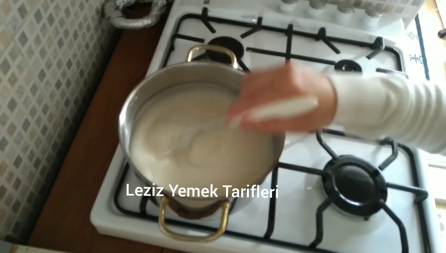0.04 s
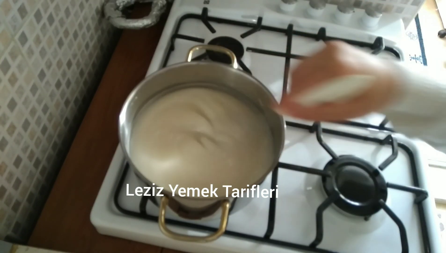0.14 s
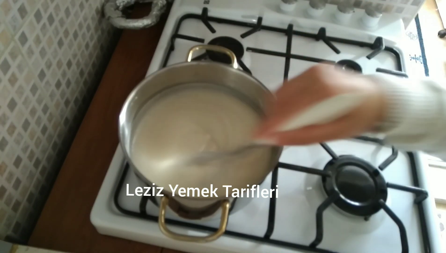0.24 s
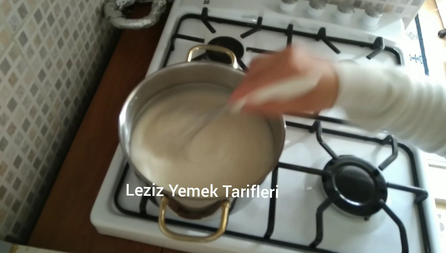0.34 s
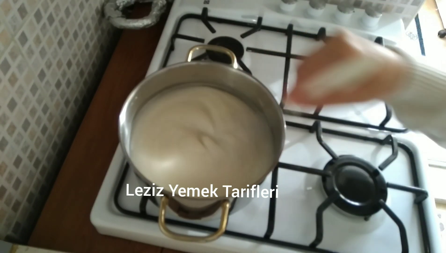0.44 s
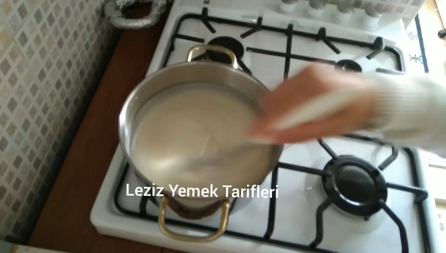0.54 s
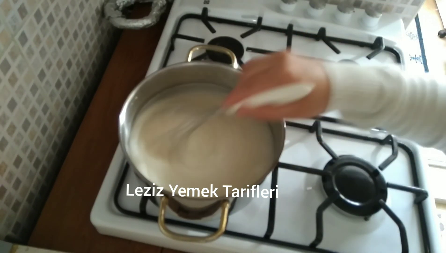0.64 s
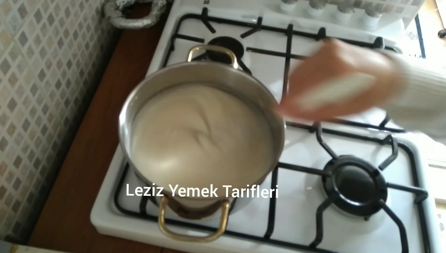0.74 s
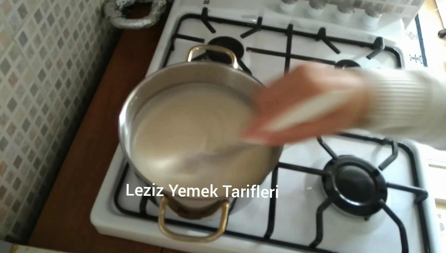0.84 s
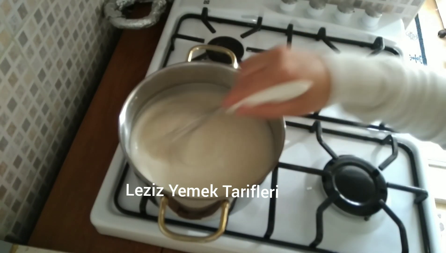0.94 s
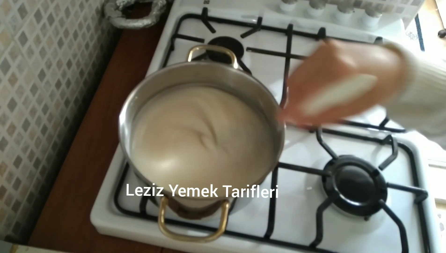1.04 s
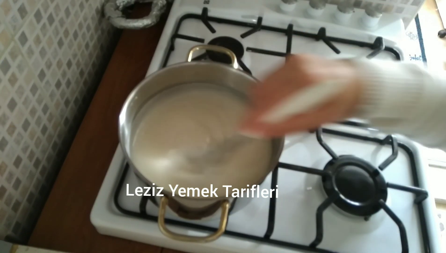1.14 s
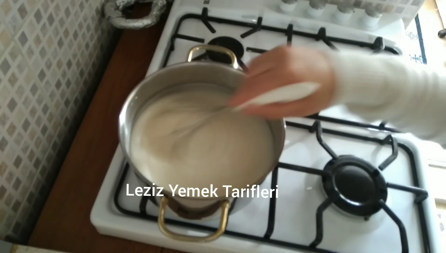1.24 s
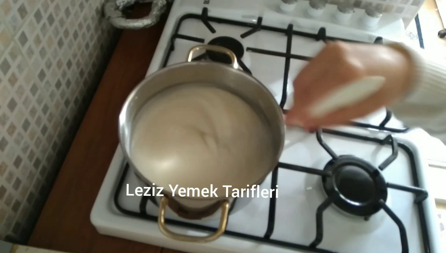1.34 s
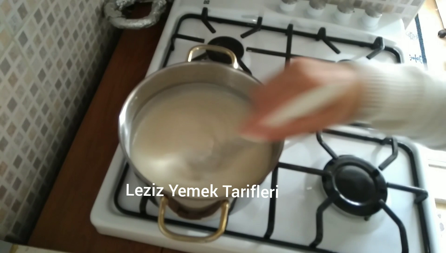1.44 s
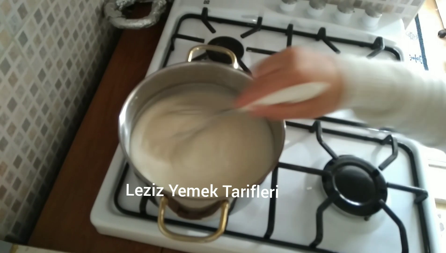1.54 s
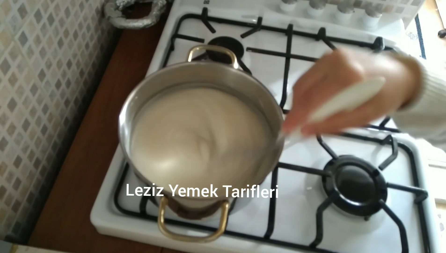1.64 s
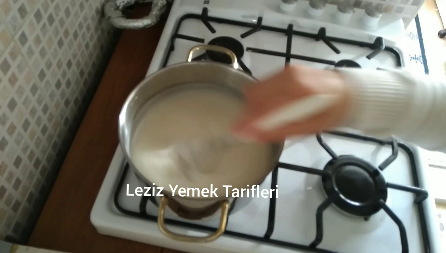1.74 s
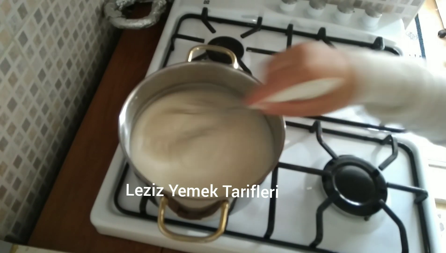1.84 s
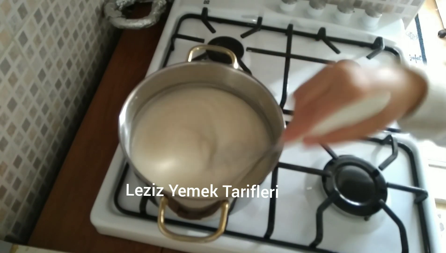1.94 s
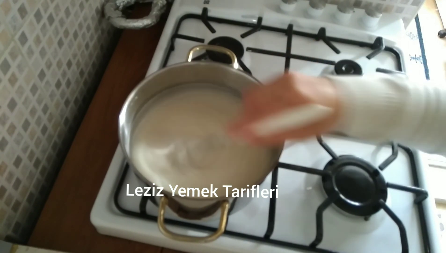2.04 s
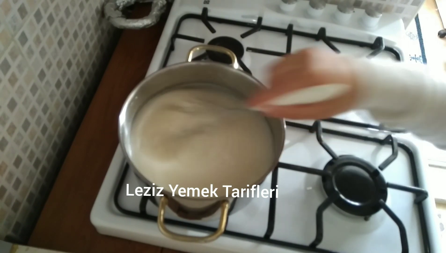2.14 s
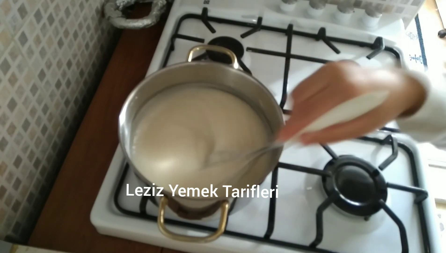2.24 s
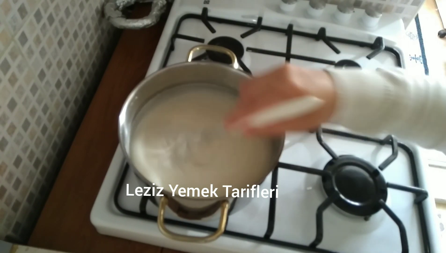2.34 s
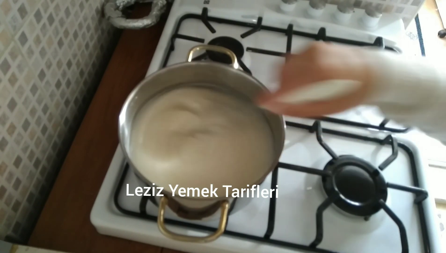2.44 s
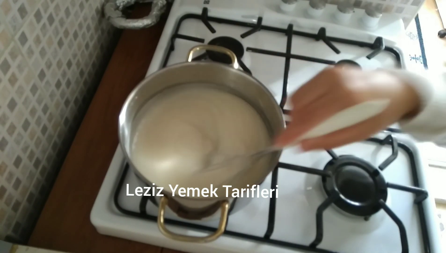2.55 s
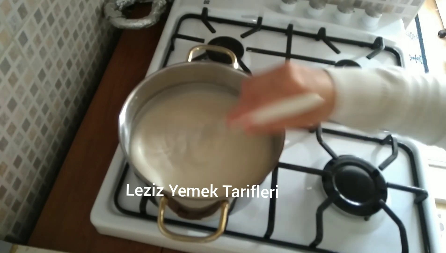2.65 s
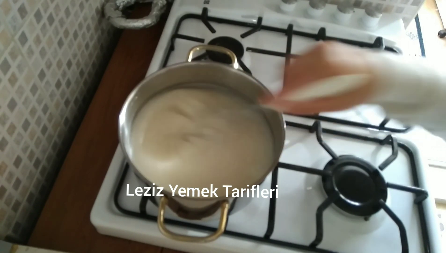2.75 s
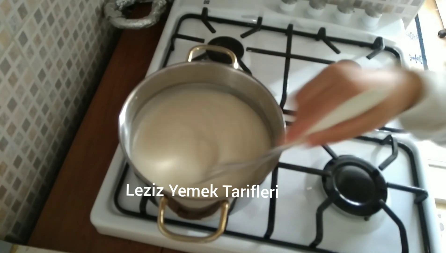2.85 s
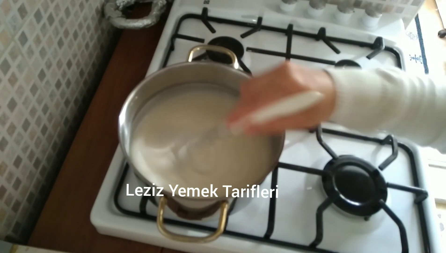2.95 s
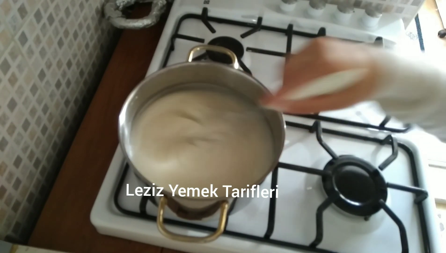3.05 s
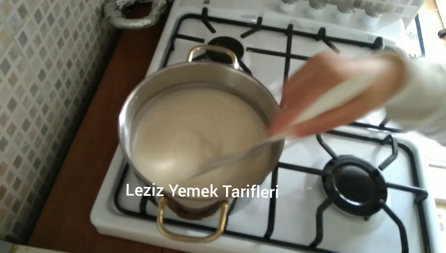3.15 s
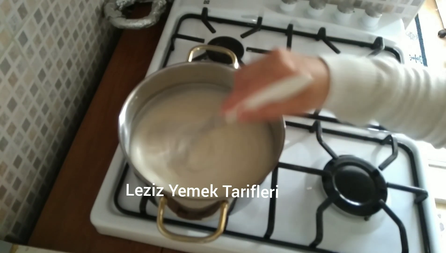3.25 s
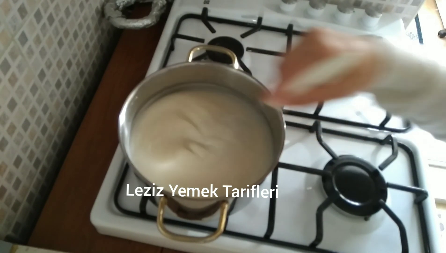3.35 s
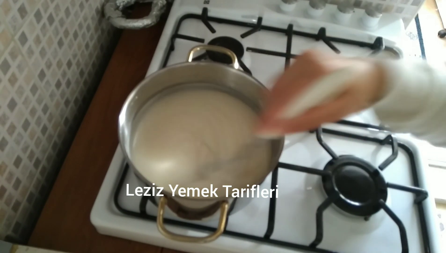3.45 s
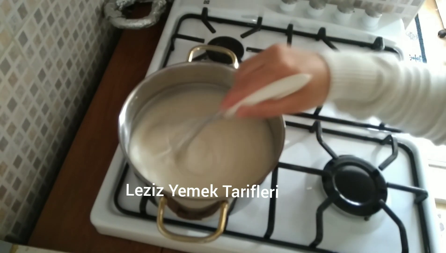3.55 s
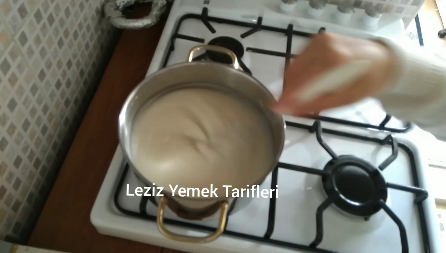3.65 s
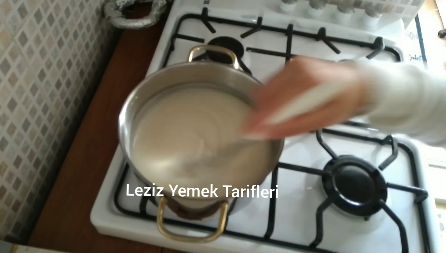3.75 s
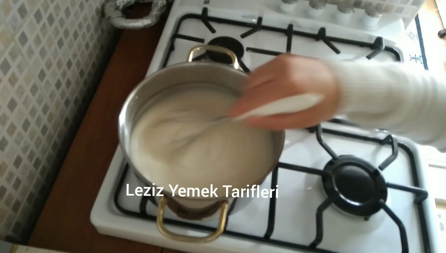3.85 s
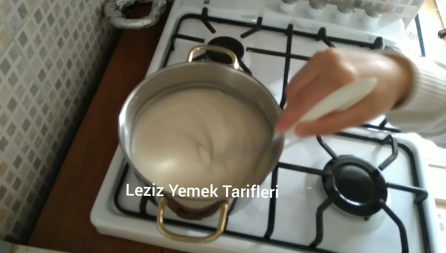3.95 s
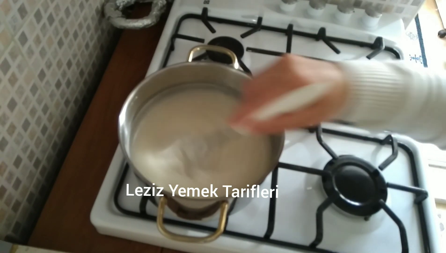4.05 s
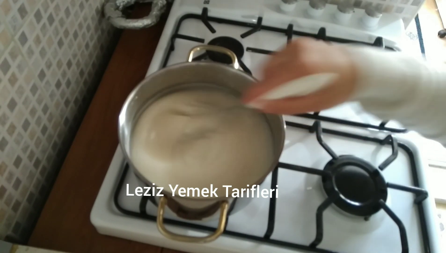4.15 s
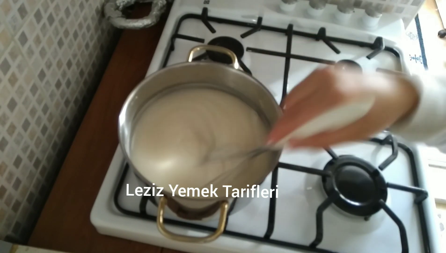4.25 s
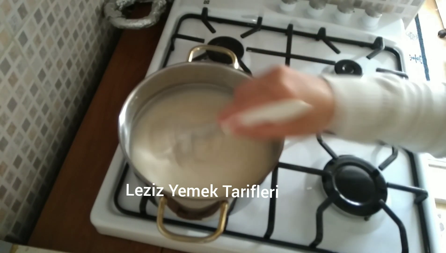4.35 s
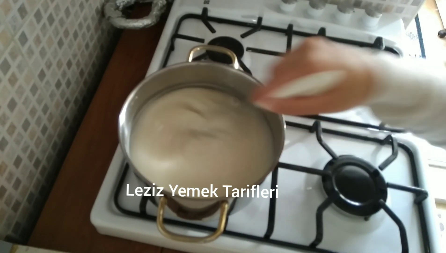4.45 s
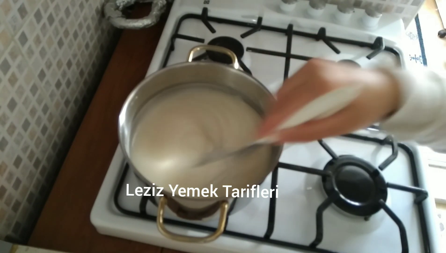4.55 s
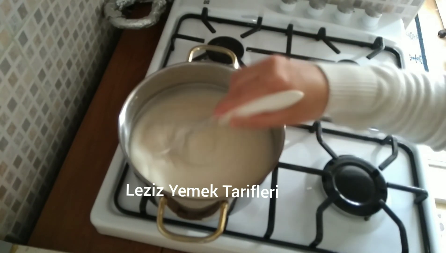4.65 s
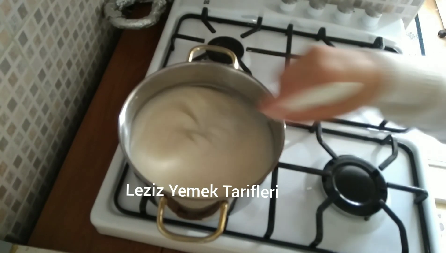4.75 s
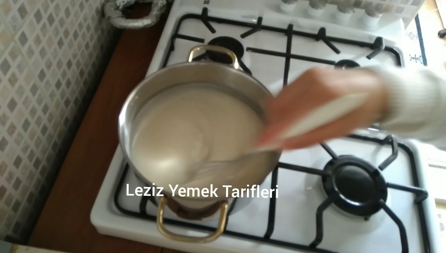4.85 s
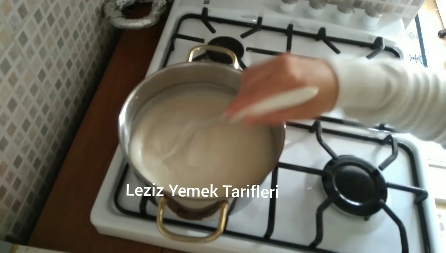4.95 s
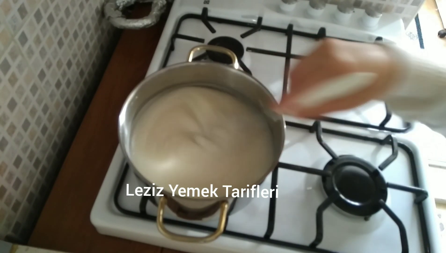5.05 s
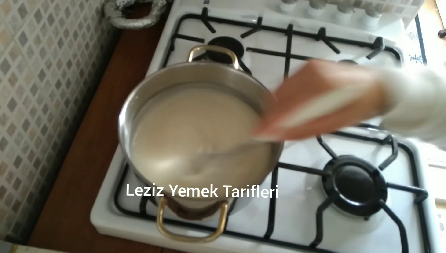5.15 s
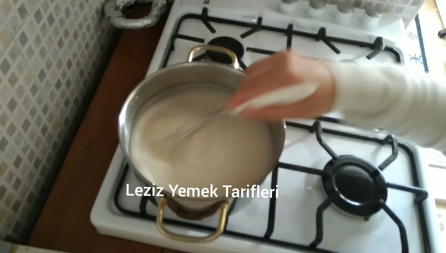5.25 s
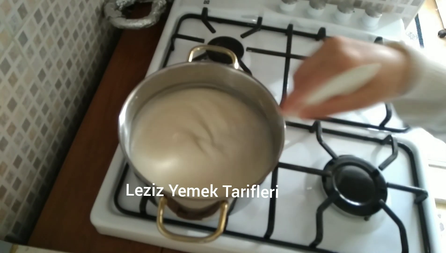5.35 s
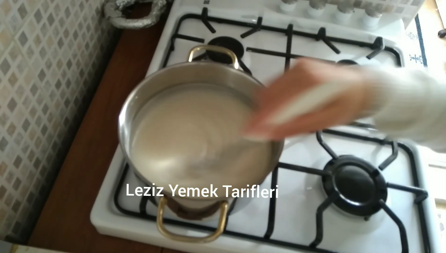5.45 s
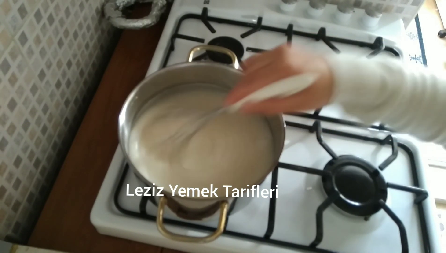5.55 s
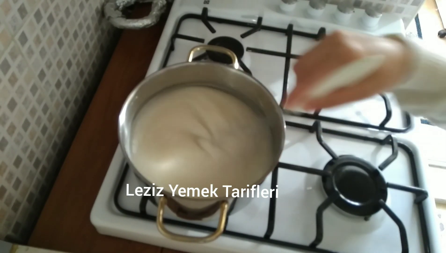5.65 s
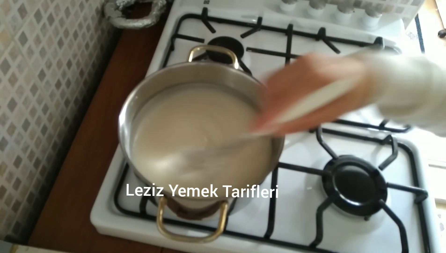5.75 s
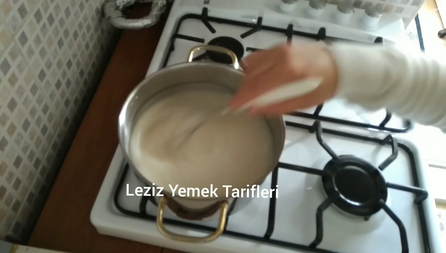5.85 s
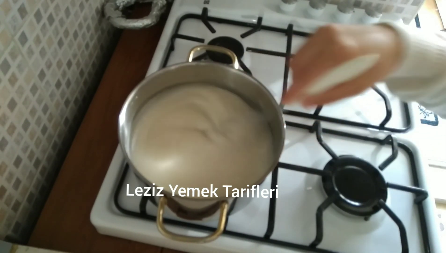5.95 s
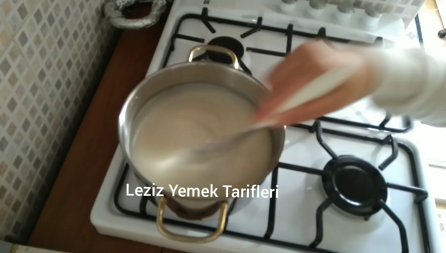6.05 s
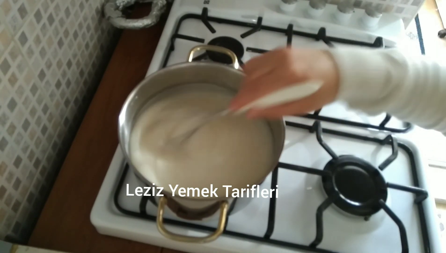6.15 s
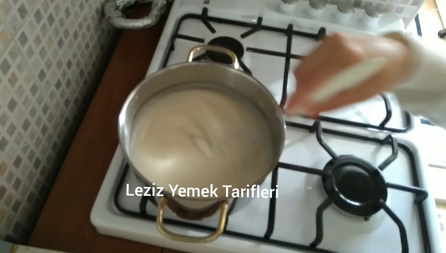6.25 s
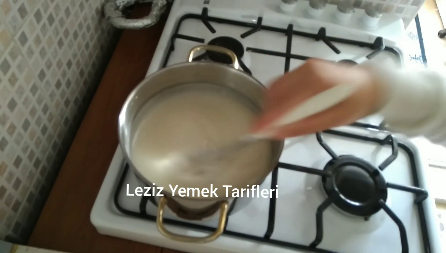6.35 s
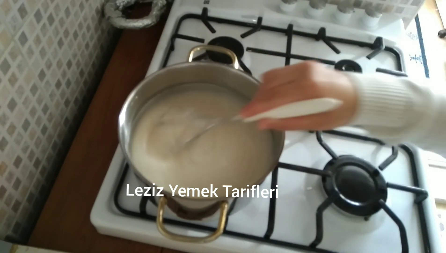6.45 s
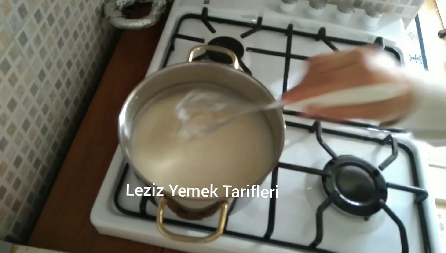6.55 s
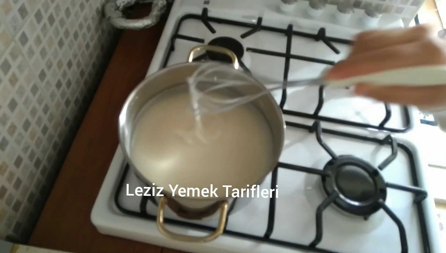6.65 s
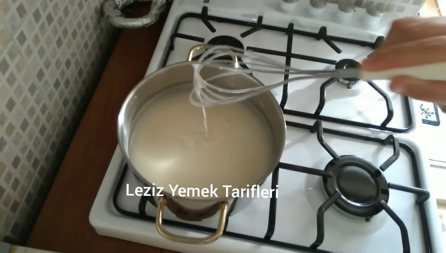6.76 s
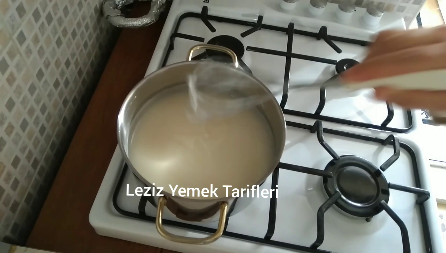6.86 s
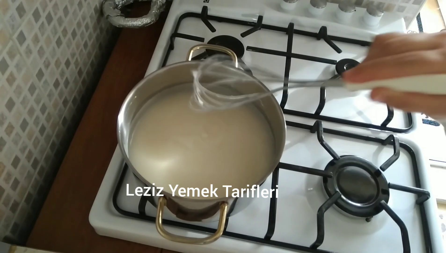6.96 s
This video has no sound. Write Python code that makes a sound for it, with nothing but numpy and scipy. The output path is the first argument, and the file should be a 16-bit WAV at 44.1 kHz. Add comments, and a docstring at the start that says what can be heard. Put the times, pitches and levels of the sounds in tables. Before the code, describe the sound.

A wire whisk is already circling quickly in a steel pot of thick liquid, close to the microphone in a small tiled kitchen. About three and a half times a second a gritty, bright metallic scrape swells and fades, made of fine hiss and coarser scratching, with a dull cushioned knock on nearly every turn. Beneath it the mixture churns low, sloshes and gives small gulps. Sharper clinks against the bare wall come around 1.5 and 1.7 seconds, loudest at 2.9, 3.2 and 3.5, then again at 4.9 and 5.5, each with a short damped pot ring and thud. Firm knocks continue between 3.3 and 4.1 seconds. The rhythm stays steady but uneven in detail until the last, weaker stroke at 6.4. At about 6.5 the scraping cuts off as the whisk lifts; thin high wires ring very faintly, small drops blip upward around 6.8, and soft room tone remains.

```python
"""A wire whisk scrapes round the bottom of a steel pot of thick mixture, about three and a half turns a second.
Wires that catch and slip are made of tiny random clicks, coloured by resonances and swelling with each turn.
Dull knocks and bright clinks are short noise bursts that also set the pot's modes ringing.
The mixture churns, sloshes and gulps: filtered clicks, and short tones that rise in pitch.
Near the end the whisk is lifted out, ringing faintly, and drips; kitchen echoes and a soft room tone lie behind."""
import sys
import numpy as np
from scipy import signal
from scipy.fft import rfft, irfft, next_fast_len
from scipy.io import wavfile
from scipy.ndimage import uniform_filter1d, map_coordinates

SR = 44100
rng = np.random.default_rng(int(sys.argv[2]) if len(sys.argv) > 2 else 0)


def master_out(mix):
    """Clip the mix to full scale and print it as 16-bit PCM to the path in sys.argv[1]."""
    frames = np.transpose(np.atleast_2d(mix))
    ceiling = np.clip(frames, -1, 1)
    pcm = np.round(ceiling * 32767).astype(np.int16)
    wavfile.write(sys.argv[1], SR, pcm)


N = 308259  # length in samples

# Some sounds add an overall level to their table levels;
# clink cracks, bubbles and ringing free wires use theirs as written.
# turns of the whisk, each level against the usual turn; columns as named in TURN_COLUMNS
# (hiss_db: after landing, return_hiss_db: in the return push)
TURN_TABLE = [(0.002, -2, -1.5, 2, 3.5, 6, -6, -7), (0.27, 1, -1.5, 3.5, -2.5, 7, 1, -5.5),
              (0.592, -2.0, 0.5, 1, 3, 5, -1, -6), (0.876, 0, -2.0, -1.0, -1.5, 0, -4.5, 4.5),
              (1.17, 0, 1.5, -1, 0, 0, 7.5, -4), (1.461, 1, 3.5, 3, 3, 5.5, -1, 2.5),
              (1.744, 2, -0.5, -1.5, -1, -3, -10, 2.5), (2.03, 1.0, 6, -3, -0.5, -4, 9.5, -7),
              (2.308, 1, 1, 1.5, -0.5, 1, -4, -1.5), (2.605, 0.0, 8, 1.0, -1, 15, -4.5, -5.5),
              (2.912, 1.5, 1.5, 3.5, 2, 0.5, 1.5, 11.5), (3.196, -0.5, 4.5, 4, 1.0, 9, 0.5, 6),
              (3.493, 0.5, 3.5, 0, 1, 3.5, 4, -4), (3.777, 1, 1.5, 0, -2, -3, 2.5, 1),
              (4.054, 0.0, -3, 0.5, -1.5, 6.5, 6.5, -11), (4.327, -0.5, 1, 0.5, 3.5, -5, 1.0, -2.5),
              (4.603, -0.5, 8, -1.5, -2, 1.0, -1.5, -2.5), (4.902, 0.5, 4, 0, 0, -12, -7, -1),
              (5.183, -1, 4, 1, -1.5, -3, 0.5, 5.5), (5.475, 2, -1.5, 1.5, 0.5, -4, 3, 2),
              (5.763, -1.5, -2, -3.5, 0.5, -3, -3, 1), (6.089, 0, 4.5, 4.5, 1, -4.5, -5, -7.0),
              (6.366, -3.5, -7, -6, -1.5, 3.5, -1, -23)]
TURN_COLUMNS = ["start_s", "hiss_db", "return_hiss_db", "scratch_db", "judder_db", "wall_hum_db",
                "churn_db", "slosh_db"]
# fine friction hiss, as a spectrum: pitch_hz, density_db (per Hz)
HISS_SPECTRUM = [(700, -49), (1500, -24), (2700, -3.5), (4200, -5), (6000, -1.5), (7700, -1.5),
                 (8600, -6.5), (9500, -1.5), (10300, -7.5), (11700, -2), (12700, -5), (14000, 1.5),
                 (15000, -6), (16000, -2)]
# resonances of the coarse scratch: pitch_hz, width_hz, level_db
SCRATCH_MODES = [(2840, 390, -5.5), (3533, 210, 4), (3960, 42, 6), (4627, 63, 6.5), (5005, 110, 4.5),
                 (5300, 596, 2.5), (6540, 290, -11.5), (6870, 180, 5), (7590, 350, 2)]
# resonances of the wires pressed on the steel: pitch_hz, width_hz, level_db
WIRE_MODES = [(1374, 360, -23), (1454, 103, -7), (1680, 153, 1), (1754, 64, 5.5), (2244, 160, -9.5),
              (2354, 98, -0.5), (3463, 270, -11.5), (3835, 330, -12.5)]
# the same contact with the wires bent further, in a hard knock: pitch_hz, width_hz, level_db
BENT_WIRE_MODES = [(1480, 193, -4.5), (1630, 37, -18), (1617, 62, -1.5), (1730, 72, -3.5), (2097, 87, -7),
                   (2190, 108, -4.5), (2403, 85, 6.5), (2475, 80, -31), (3300, 137, -7.5),
                   (4530, 180, -13.5)]
# hum of the pot wall as the wires drag along it: pitch_hz, width_hz, level_db
WALL_MODES = [(1005.3, 32, 3.5), (927, 60, -10), (632.4, 12, -5.5), (729, 46, -8)]
# dull knocks under the mixture: start_s, level_db, upper_db (wire resonances above 2 kHz),
# ring_db (ring of the pot), length_s
KNOCK_TABLE = [(0.045, -38, 1, -55.5, 0.018), (0.122, -37, 23, -79, 0.0079),
               (0.3355, -34, -12, -51, 0.0038), (0.496, -40, -4, -61, 0.016),
               (0.641, -32.5, -5.5, -50.5, 0.008), (0.929, -33, 4, -51, 0.018),
               (1.228, -32, 0.5, -46.5, 0.013), (1.517, -36.5, 2.5, -46.5, 0.0054),
               (1.682, -40.5, -34, -86, 0.013), (1.789, -34.5, -4, -44, 0.017),
               (2.11, -38.5, 22, -54, .008), (2.361, -51, 15, -46.5, 0.021),
               (2.598, -42.5, -9.5, -68.5, 0.0036), (2.662, -39.5, 0, -54.5, 0.012),
               (2.818, -44, 2, -58, 0.024), (2.971, -35, -5, -62, 0.0036), (3.276, -31.5, 1, -43, 0.0036),
               (3.566, -29.5, 1.5, -46.5, 0.0087), (3.835, -30, 0.5, -46, 0.011),
               (4.107, -34.5, 3, -57, 0.014), (4.377, -34, -3, -48.5, 0.018),
               (4.674, -34.5, -3, -57, 0.0042), (4.943, -37.5, 1, -45, 0.013),
               (5.232, -35.5, -0.5, -45.5, 0.015), (5.547, -35.5, -3.5, -54, 0.012),
               (5.773, -38, 4, -75, .013), (5.913, -40, 5.5, -57, 0.032), (5.951, -40, 5, -53.5, 0.0021),
               (6.131, -37, -5, -51, 0.021)]
# clinks on the bare wall: start_s, level_db, ring_db (ring of the pot), tilt_db (per octave)
CLINK_TABLE = [(0.457, -42.5, -65, -2), (1.188, -47, -76, 7), (1.462, -34, -43.5, -4),
               (1.734, -31, -40, -4.5), (2.891, -24, -37.5, -3), (3.206, -27.5, -38, -5),
               (3.4729, -25, -40.5, -3.5), (4.896, -28, -43, -6.5), (5.471, -26, -38.5, -3.5),
               (5.767, -52.5, -59, -8)]
# resonances of the bright clink: pitch_hz, width_hz, level_db
CLINK_MODES = [(1920, 200, -6.5), (2358, 45, 1), (3550, 1600, -10), (3810, 360, -3), (4620, 330, 4),
               (4800, 63, -1), (5170, 310, -10.5), (6230, 1200, -1.5), (7500, 1300, -0.5),
               (9100, 700, -4.5), (11540, 1300, -20.5), (14460, 4600, -3.5)]
# the pot jolted on the grate: pitch_hz, width_hz, level_db
THUD_MODES = [(130, 46, 6), (290, 51, 5), (637, 150, 3)]
# modes of the filled pot: pitch_hz, level_db, t60_s (time to die away by 60 dB)
POT_MODES = [(111, -12, 0.15), (224.4, -4, 0.11), (341, 6.5, 0.18), (429, -17.5, 0.41),
             (461.4, -12.5, 0.22), (538, -16.5, 0.35), (570, -21.5, 0.09), (615, -1.5, 0.25),
             (645.4, 0.5, 0.18), (650, -7.5, 0.18), (726, 4.5, 0.16), (744, 9, 0.17), (804, -35.5, .16),
             (980, -5, 0.49)]
# the free wires ringing in the air: pitch_hz, level_db, t60_s
FREE_WIRE_MODES = [(7779, -91.5, 0.67), (9500, -87.5, 1.1), (11150, -75, 1.4), (11300, -85.5, 1.3),
                   (12925, -72.5, 0.81), (13160, -76.5, 2.1)]
# drops falling from the whisk: start_s, level_db, pitch_hz (at the start of the drop)
DRIP_TABLE = [(6.625, -70.5, 1740), (6.66, -71, 1330), (6.725, -79, 1500), (6.816, -57, 2450),
              (6.838, -53, 2264), (6.85, -71, 1390), (6.865, -67, 2380), (6.916, -77, 1880)]
# low churning of the thick liquid, as a spectrum: pitch_hz, density_db (per Hz)
CHURN_SPECTRUM = [(15, -21), (40, -39), (62, -1), (80, -8.5), (103, 8), (125, -1.5), (155, 3), (200, -20.5),
                  (300, -14.5), (800, -63)]
# sloshing of the thick liquid, as a spectrum: pitch_hz, density_db (per Hz)
SLOSH_SPECTRUM = [(100, -16), (170, -4.5), (235, -1.5), (345, 5), (420, -4.5), (520, -10.5), (620, -4),
                  (750, -4), (870, -8.5), (1200, -12.5), (2000, -32), (6000, -64)]
# stray bubbles that pop in the mixture: start_s, level_db, pitch_hz
BUBBLE_TABLE = [(.665, -52.5, 613), (1.15, -54, 336), (2.202, -49.5, 326), (2.25, -55.5, 235),
                (2.331, -53.5, 300), (2.76, -60.5, 470), (2.832, -61, 388), (4.45, -55, 340),
                (5.95, -59, 609)]
# steady dips, and a few lifts, between the groups of modes: pitch_hz, width_hz, change_db
NOTCH_TABLE = [(516, 66, -18), (830, 44, 2.5), (1150, 120, 4), (1954, 55, -8), (2750, 540, -1),
               (4110, 84, -4.5), (6630, 170, -5.5)]
# dips that open where the whisk passes a node: pitch_hz, width_hz, depth_db (typical), place (share of a turn)
HOLLOW_TABLE = [(517, 163, -7.5, .8), (1130, 140, -6.5, 0.58), (2050, 104, -10, 0.79),
                (4280, 170, -15, 0.82)]
# how fast the kitchen echoes die away: pitch_hz, t60_s
ECHO_DECAY = [(100, 0.17), (700, 0.2), (4000, 0.28), (9000, 0.13), (16000, 0.14)]
# steady room tone, as a spectrum: pitch_hz, density_db (per Hz)
ROOM_SPECTRUM = [(18, -44.5), (30, -3), (87, 8.5), (165, -19), (212, -21.5), (295, -11.5), (665, -24.5),
                 (2250, -23.5), (3060, -28), (7250, -27), (13000, -31)]
# gain of the left-right difference: pitch_hz, gain_db
SIDE_SPECTRUM = [(100, -38), (1000, -36.5), (3600, -64), (4600, -14.5), (6000, -7.5), (8000, -9),
                 (11000, -4), (16000, -10)]

EDGE_HZ = 15850  # upper edge of the whole sound
LAST_TURN_S = 0.275
# the whisk leaves the mixture and the stirring dies away
LIFT_S, LIFT_DB_PER_S, LIFTED_DB = 6.47, 339.5, -33
# every turn runs the same course (places and widths are shares of a turn):
# the wires settle, plough into the mixture, push back along the far side and ease off the bottom
SETTLE, EASE_OFF = 0.18, 0.7
PLOUGH_AT, PLOUGH_WIDTH = 0.2876, 0.1249
PUSH_AT, PUSH_WIDTH = 0.786, 0.048
WALL_AT, WALL_WIDTH = 0.91, 0.33
# contact at the start, extra loss by the end, and sag over the turn
UNSETTLED_DB, EASED_DB, SAG_DB = -12, -8.5, -3.5
# how strongly the load lowers the wire resonances, before the share taken in bent()
PLOUGH_BEND, PUSH_BEND = 0.055, 0.027
# the usual air pocket that closes behind the whisk
GULP_AT, GULP_HZ, GULP_DB = 0.26, 242.3, -57

TIME = np.arange(N) / SR
BINS = np.abs(np.fft.fftfreq(4096, 1 / SR))  # pitches in Hz at which filters are drawn
TURN_EDGES = np.array([row[0] for row in TURN_TABLE] + [TURN_TABLE[-1][0] + LAST_TURN_S])
TURNED = np.interp(TIME, TURN_EDGES, np.arange(len(TURN_EDGES)))  # turns made so far


def friction(grip):
    """Wires catch and slip on the bottom: a fine hiss and a coarser scratch, both swelling with the stroke."""
    hiss = colour(slips(per_s=11000, spread_db=0.0) * gain_of(2.04 * grip), read(HISS_SPECTRUM, BINS))
    hiss = shifting(hiss, span_hz=500, span_s=0.043, depth=0.67)
    scratch = colour(slips(per_s=5000, spread_db=3.0) * gain_of(2 * grip), humps(SCRATCH_MODES))
    scratch = shifting(scratch, span_hz=380, span_s=0.074, depth=1.7)
    returning = passing(at=0.8, width=0.13)
    push_db = effort("return_hiss_db", at=PUSH_AT)
    hiss_db = -42.3 + contact()
    hiss_db += (1 - returning) * effort("hiss_db", at=PLOUGH_AT)
    hiss_db += returning * push_db
    scratch_db = -50.5 + 0.7 * contact() + effort("scratch_db", at=0.67)
    scratch_db += passing(PUSH_AT, PUSH_WIDTH) * (3 + push_db)
    return hiss * gain_of(hiss_db) + scratch * gain_of(scratch_db)


def judder(grip):
    """Coarser slips ring the wires, muffled while they plough; the wall hums as they drag along it."""
    chatter_db = 1.0 * grip + 1.46 * wander(hz=24.2)
    wires = colour(slips(per_s=1800, spread_db=3.0) * gain_of(chatter_db), humps(WIRE_MODES))
    wires = shifting(bent(wires, share=0.696), span_hz=278, span_s=0.089, depth=1.0)
    hum = colour(slips(per_s=1500, spread_db=2.0), humps(WALL_MODES))
    hum = shifting(hum, span_hz=120, span_s=0.16, depth=0.45, size=1024)
    wires_db = -46 + 0.28 * contact() + effort("judder_db", at=0.17)
    wires_db += 3 * passing(PUSH_AT, PUSH_WIDTH) - 3.2 * passing(at=0.31, width=0.089)
    hum_db = -81 + 0.74 * effort("wall_hum_db", at=WALL_AT) + 21 * passing(WALL_AT, WALL_WIDTH)
    return wires * gain_of(wires_db) + hum * gain_of(hum_db)


def bent(x, share):
    """Resonances glide down and back as the wires flex, twice a turn."""
    pitch = 1 - PLOUGH_BEND * passing(PLOUGH_AT, PLOUGH_WIDTH) - PUSH_BEND * passing(PUSH_AT, PUSH_WIDTH)
    speed = (pitch / pitch.mean()) ** share
    return map_coordinates(x, [np.cumsum(speed) % N], order=3)


def airborne(dip_db=-7):
    """The wires jump off the bottom just before they strike the wall, most before loud clinks."""
    away = np.zeros(N)
    for s, db, _, _ in CLINK_TABLE:
        away += np.exp(-((TIME - s + 0.0046) / 0.01) ** 2) * np.clip((db + 44) / 10, 0, 1)
    return gain_of(dip_db * away)


def contact():
    """How firmly the wires lie on the bottom, in dB: attack, sagging hold and release in every turn."""
    place = TURNED % 1
    settling = UNSETTLED_DB * np.maximum(1 - place / SETTLE, 0)
    easing = EASED_DB * np.maximum(place - EASE_OFF, 0) / (1 - EASE_OFF)
    return settling + SAG_DB * place + easing


def effort(column, at):
    """One dB column of the turns, reached at the given place in each turn and gliding in between."""
    levels = np.array(TURN_TABLE)[:, TURN_COLUMNS.index(column)]
    return np.interp(TURNED, np.arange(len(TURN_TABLE)) + at, levels)


def passing(at, width):
    """Swells from 0 to 1 and back as the whisk passes one place in the pot."""
    distance = (TURNED - at + 0.5) % 1 - 0.5
    return np.exp(-(distance / width) ** 2)


def immersed():
    """Gain that falls as the whisk is lifted out."""
    return gain_of(np.clip((LIFT_S - TIME) * LIFT_DB_PER_S, LIFTED_DB, 0))


def knocks():
    """Several wires land one after another, cushioned by the mixture; the harder they land, the more they bend."""
    out, t = np.zeros(N), np.arange(SR // 6) / SR
    upper = uniform_filter1d((BINS > 2000) * 1., 20)
    soft, hard = humps(WIRE_MODES), humps(BENT_WIRE_MODES)
    for s, db, upper_db, ring_db, length in KNOCK_TABLE:
        bend = np.clip((db + 41.5) / 7, 0, 1)
        cushion = 1 - np.exp(-t / (0.71 * length))
        contacts = rng.standard_normal(len(t)) * cushion * np.exp(-(t / length) ** 1.64)
        tone_db = bend * hard + (1 - bend) * soft + upper_db * upper
        add(out, s, gain_of(db - 2.0) * topped(colour(contacts, tone_db)))
        add(out, s, gain_of(ring_db - 3.0) * pot_ring(tilt_db=-15.5, rise_s=0.0069))
    return out


def clinks():
    """A wire strikes bare steel: a brief buzzing crack, then the pot rings and thuds on its grate."""
    out, t = np.zeros(N), np.arange(SR // 4) / SR
    octaves = np.log2(np.maximum(BINS, 1000) / 5000)  # tilt pivots at 5 kHz and stays flat below 1 kHz
    for s, db, ring_db, tilt_db in CLINK_TABLE:
        buzz = rng.standard_normal(len(t)) * (1 - np.exp(-t / 0.00048)) * np.exp(-t / 0.0043)
        # every strike stirs the resonances a little differently
        spot = [(hz, width, level + 4.6 * rng.standard_normal()) for hz, width, level in CLINK_MODES]
        crack = colour(buzz, humps(spot) + tilt_db * octaves)
        add(out, s, gain_of(db) * topped(crack, size=220))
        add(out, s, gain_of(ring_db - 2.0) * pot_ring(tilt_db=-1.4, rise_s=0.0043))
        thud = colour(rng.standard_normal(len(t)) * np.exp(-t / 0.045), humps(THUD_MODES))
        add(out, s, gain_of(ring_db - 5.5) * topped(thud, size=900))
    return out


def pot_ring(tilt_db, rise_s):
    """The pot's modes after one blow; each spot on the wall stirs them a little differently."""
    t = np.arange(SR // 3) / SR
    ring = np.zeros(len(t))
    main_hz = POT_MODES[2][0]
    for hz, db, t60 in POT_MODES:
        spot, detune, phase = rng.standard_normal(3)
        # the tilt, in dB per octave, acts above the main mode only
        level = db + tilt_db * np.log2(hz / main_hz) * (hz > main_hz) + 0.92 * spot
        turns = hz * (1 + 0.009 * detune) * t + phase
        ring += gain_of(level - 60 * t / t60) * np.sin(2 * np.pi * turns)
    return topped(ring * (1 - np.exp(-t / rise_s)) ** 2, size=900)


def mixture():
    """The thick liquid churns low down, sloshes in hollows behind the whisk and booms in the pot's main mode."""
    churn = evened(colour(slips(per_s=490, spread_db=2.0), read(CHURN_SPECTRUM, BINS)))
    slosh = colour(slips(per_s=300, spread_db=1), read(SLOSH_SPECTRUM, BINS))
    slosh = shifting(slosh, span_hz=180, span_s=0.088, depth=2.7, size=1024)
    boom = evened(colour(slips(per_s=400, spread_db=2.5), humps([(POT_MODES[2][0], 24, 0)])))
    churn_db = -61.5 + 0.9 * effort("churn_db", at=0.45) + 7.7 * passing(at=0.27, width=0.12)
    slosh_db = -76 + 0.45 * effort("slosh_db", at=0.62) + 16 * passing(at=0.41, width=0.28)
    boom_db = -57 + 0.76 * effort("slosh_db", at=0.3)
    boom = boom * gain_of(boom_db) * passing(at=0.29, width=0.083)
    return churn * gain_of(churn_db) + slosh * gain_of(slosh_db) + boom


def gulps():
    """An air pocket closes once a turn, louder when the mixture sloshes; it and stray bubbles ring, rising."""
    out, t = np.zeros(N), np.arange(SR // 6) / SR
    chance = rng.standard_normal(len(TURN_TABLE))
    pockets = []
    for row, length, size in zip(TURN_TABLE, np.diff(TURN_EDGES), chance):
        pockets.append((row[0] + GULP_AT * length, GULP_DB + 0.7 * row[-1], GULP_HZ * np.exp(0.19 * size)))
    for s, db, hz in pockets + list(BUBBLE_TABLE):
        turns = np.cumsum(hz * (0.95 + 2.2 * t)) / SR
        pocket = np.sin(2 * np.pi * turns) * (1 - np.exp(-t / 0.003)) * np.exp(-t / 0.022)
        add(out, s, gain_of(db) * topped(pocket, size=900))
    return out


def lift_out(s=6.5):
    """Freed from the mixture, the wires sing thinly and shed a few drops that blip upward in pitch."""
    out, t = np.zeros(N), np.arange(SR // 2) / SR
    for hz, db, t60 in FREE_WIRE_MODES:
        detune = rng.uniform(0.996, 1.004, (3, 1))  # three wires almost in tune
        trio = np.sin(2 * np.pi * hz * detune * t).sum(0)
        add(out, s, gain_of(db - 60 * t / t60) * trio * (1 - np.exp(-t / 0.025)))
    for when, db, hz in DRIP_TABLE:
        tone = np.sin(2 * np.pi * hz * t * (1 + 0.53 * t))
        blip = tone * (1 - np.exp(-t / 0.0011)) * np.exp(-t / 0.0065)
        add(out, when, gain_of(db - 4.5) * topped(blip, size=200))
    return out


def notched(x):
    """Shapes what the pot radiates with fixed dips, and a few lifts, between its groups of modes."""
    return colour(x, sum(db * np.exp(-((BINS - hz) / width) ** 2) for hz, width, db in NOTCH_TABLE))


def hollowed(x):
    """Each antiresonance deepens at its own place in the turn, never twice alike."""
    hz, t, z = signal.stft(x, SR, nperseg=1024, noverlap=768)
    for centre, width, db, at in HOLLOW_TABLE:
        uneven = np.maximum(1 + 0.34 * wander(hz=8.2), 0)
        depth = np.interp(t, TIME, passing(at, width=0.24) * uneven)
        z = z * gain_of(db * np.exp(-((hz[:, None] - centre) / width) ** 2) * depth)
    return signal.istft(z, SR, nperseg=1024, noverlap=768)[1][:N]


def shifting(x, span_hz, span_s, depth, size=512):
    """As the contact travels, it crosses nodes and bellies of the modes: peaks and notches drift through."""
    hz, t, z = signal.stft(x, SR, nperseg=size, noverlap=size * 3 // 4)
    across = np.fft.fftfreq(len(hz), hz[1])[:, None] * span_hz
    along = np.fft.fftfreq(len(t), t[1]) * span_s
    # a random pattern, smoothed over pitch and time
    chance = rng.standard_normal(z.shape) + 1j * rng.standard_normal(z.shape)
    smooth = np.fft.ifft2(chance * np.exp(-np.pi * (across ** 2 + along ** 2)))
    coupling = np.abs(smooth) ** depth
    power = np.mean(np.abs(z) ** 2, axis=1)
    coupling /= np.sqrt(power @ coupling ** 2 / power.sum())  # the total power stays with the stroke
    return evened(signal.istft(z * coupling, SR, nperseg=size, noverlap=size * 3 // 4)[1][:N])


def kitchen(x):
    """Dense early echoes from tiles and stove top, each band dying at its own speed."""
    size = SR // 2
    taps = rng.choice([-1., 1.], size) * (rng.random(size) < 3000 / SR)
    taps *= np.arange(size) > 0.004 * SR  # no echo in the first 4 ms
    hz, t, z = signal.stft(taps, SR, nperseg=256)
    fade = gain_of(-60 * t / read(ECHO_DECAY, hz)[:, None])
    tail = signal.istft(z * fade, SR, nperseg=256)[1]
    return signal.fftconvolve(x, tail / np.linalg.norm(tail))[:N]


def room_tone():
    """Steady soft background: random noise shaped by the room spectrum."""
    return gain_of(-69.5) * evened(colour(rng.standard_normal(N), read(ROOM_SPECTRUM, BINS)))


def slips(per_s, spread_db):
    """Tiny stick-slip impulses of uneven size, at random moments."""
    size = gain_of(spread_db * np.minimum(rng.exponential(1, N), 4))
    return size * rng.choice([-1, 1], N) * (rng.random(N) < per_s / SR)


def wander(hz):
    """Slow chance of rms 1, mostly below the given rate."""
    size = next_fast_len(N)
    lowpass = 1 / (1 + (np.fft.rfftfreq(size, 1 / SR) / hz) ** 4)
    return evened(irfft(rfft(rng.standard_normal(size)) * lowpass, size)[:N])


def humps(modes):
    """Gain in dB of a set of steep-sided resonances."""
    power = 1e-7  # floor
    for hz, width, db in modes:
        power = power + gain_of(db) ** 2 / (1 + ((BINS - hz) / width * np.sqrt(2)) ** 2) ** 2
    return 10 * np.log10(power)


def colour(x, db):
    """Causal filter with the given gain, so that every click rings on after it."""
    log_gain = db * np.log(10) / 20
    taps = np.fft.ifft(np.exp(np.conj(signal.hilbert(log_gain)))).real
    return signal.oaconvolve(x, taps[:len(taps) // 2])[:len(x)]


def read(points, hz):
    """A two-column curve joined by straight lines over log frequency."""
    f, value = np.transpose(points)
    return np.interp(np.log(hz + 1), np.log(f + 1), value)


def gain_of(db):
    """Decibels to a factor."""
    return 10 ** (np.asarray(db) / 20)


def evened(x):
    """Scales to rms 1, a standard average loudness."""
    return x / np.sqrt(np.mean(x ** 2) + 1e-20)


def topped(x, size=400):
    """Scales so that the loudest stretch of size samples has rms 1."""
    return x / np.sqrt(uniform_filter1d(x ** 2, size).max() + 1e-20)


def add(mix, s, sound):
    """Mixes a sound in at time s, in seconds."""
    part = mix[max(round(s * SR), 0):][:len(sound)]
    part += sound[:len(part)]


def scene():
    """Pot and whisk in the middle; mainly the treble spreads to the sides."""
    grip = wander(hz=32)  # the wires chatter in and out of contact
    whisk = (friction(grip) + judder(grip)) * airborne()
    rub = hollowed(notched((whisk + mixture()) * immersed()))
    dull, bright = knocks() + gulps() + lift_out(), clinks()
    echoes = kitchen(gain_of(-13.0) * rub + gain_of(-4.0) * dull + gain_of(-6.0) * bright)
    still_air = room_tone()
    mid = rub + dull + bright + echoes + still_air
    # new friction clicks under the same grip widen the sound
    scattered = notched(friction(grip)) * airborne() * immersed()
    scattered = scattered + gain_of(-16.5) * kitchen(bright) + still_air
    side = colour(scattered, read(SIDE_SPECTRUM, BINS))
    return np.array([mid + side, mid - side])


def record(dry):
    """Steep low-pass filter that removes nearly everything above the band edge."""
    lowpass = signal.firwin(511, EDGE_HZ, window=("kaiser", 9), fs=SR)
    return signal.oaconvolve(dry, lowpass[None], "same")


dry = scene()
out = record(dry)
master_out(out)
```